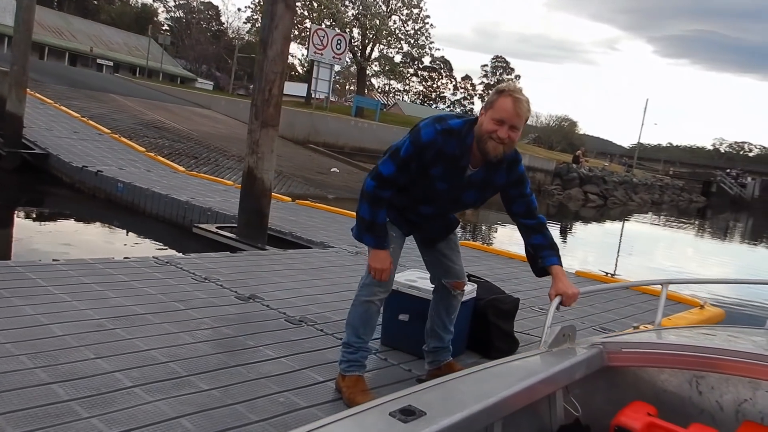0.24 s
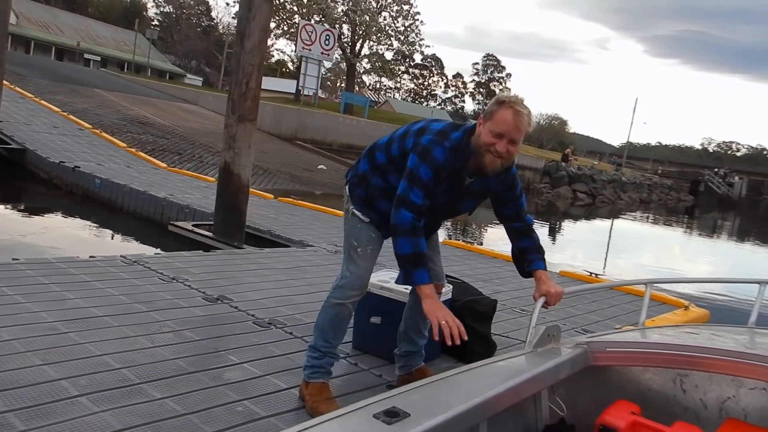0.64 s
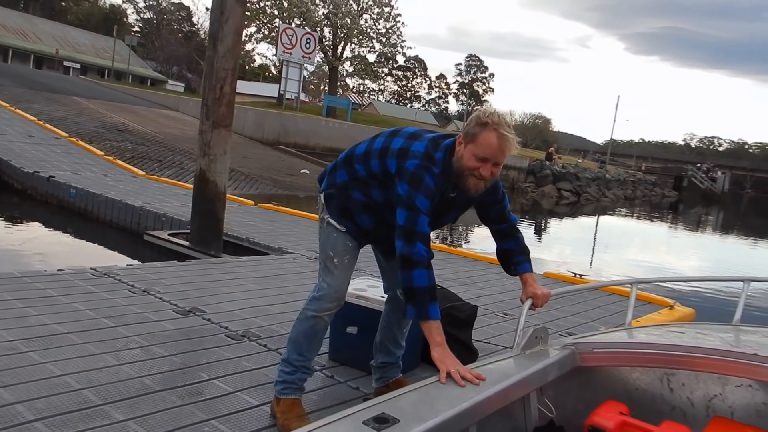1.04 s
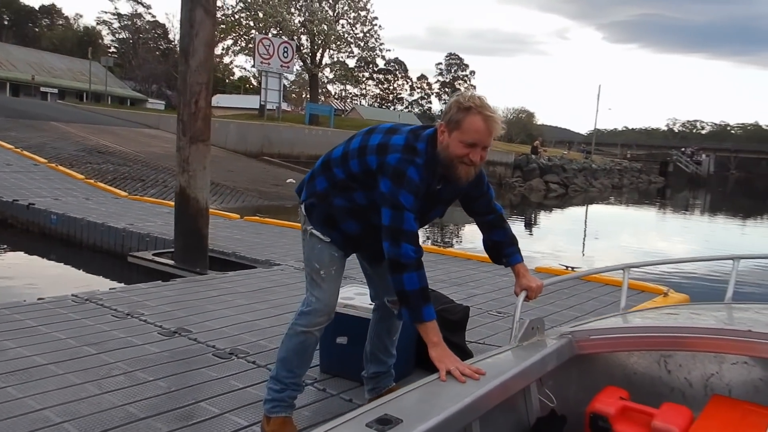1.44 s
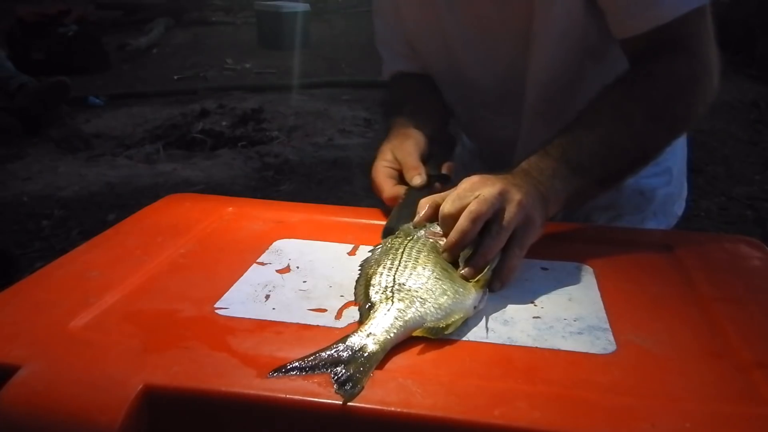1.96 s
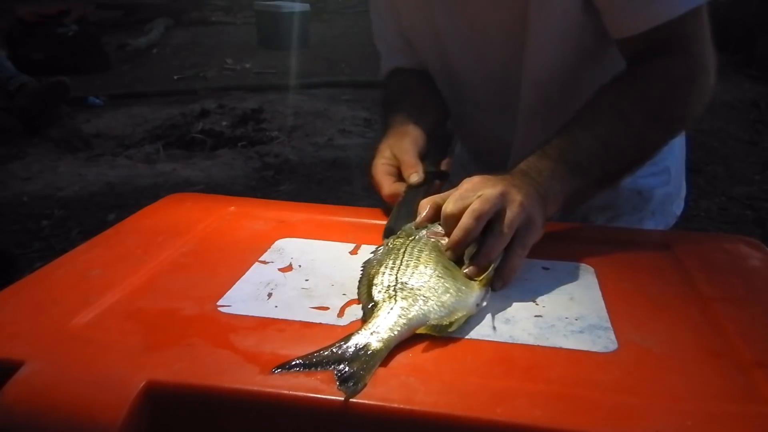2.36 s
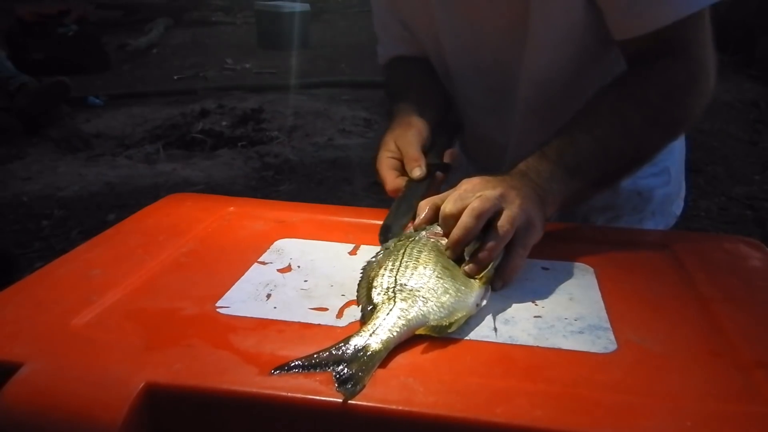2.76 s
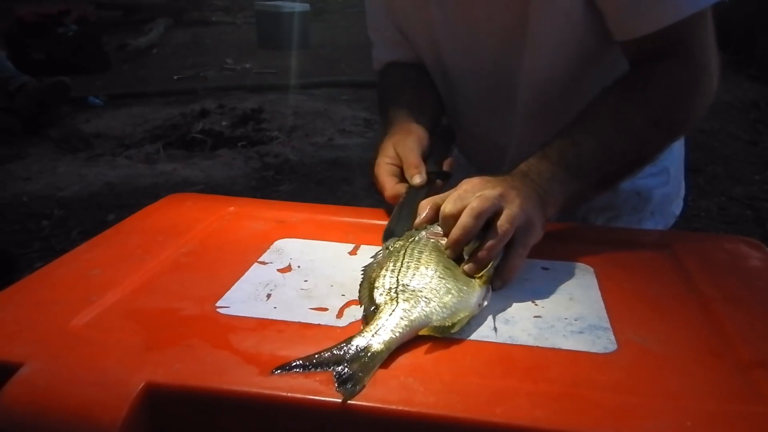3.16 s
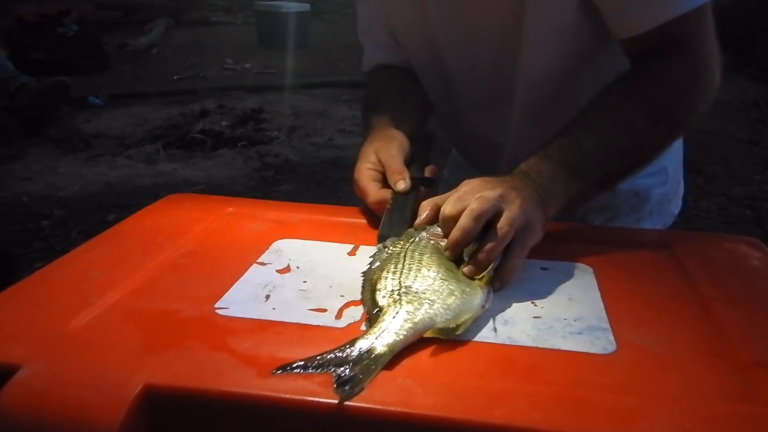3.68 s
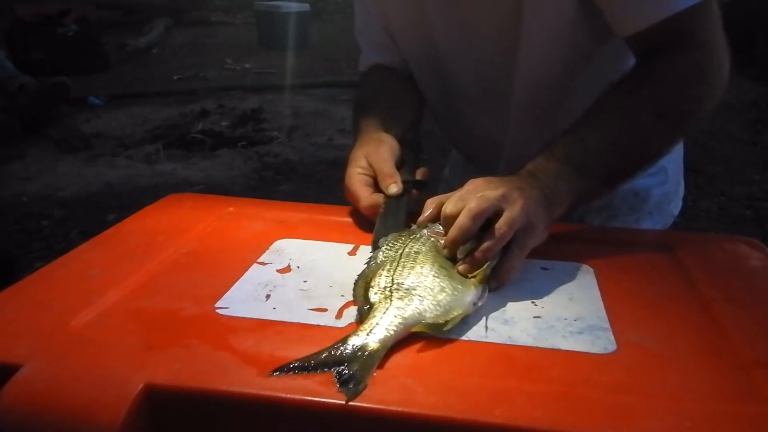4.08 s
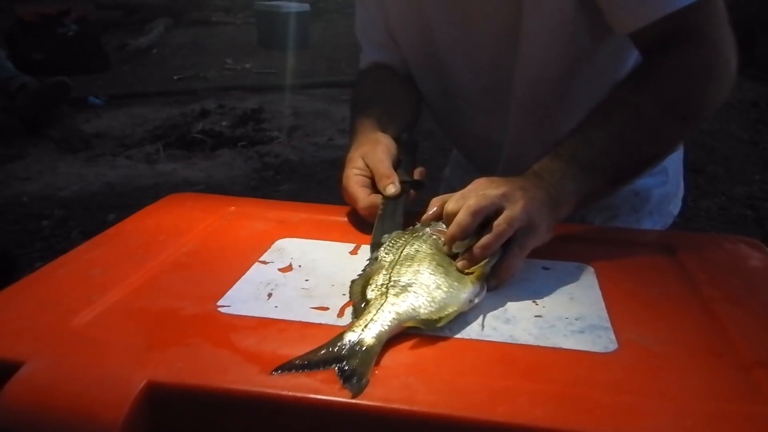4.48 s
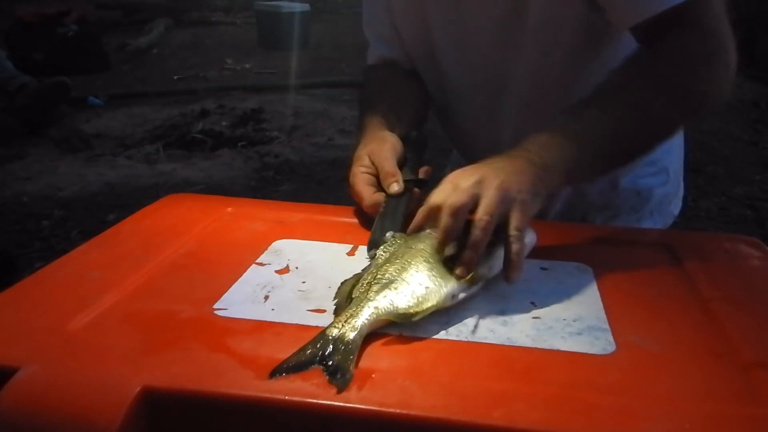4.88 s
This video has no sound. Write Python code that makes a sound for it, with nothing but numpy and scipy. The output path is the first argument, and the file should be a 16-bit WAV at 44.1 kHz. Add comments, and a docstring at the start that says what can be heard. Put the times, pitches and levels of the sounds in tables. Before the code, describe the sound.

Rumbling outboard and droning metal hull stop at a sudden cut, leaving soft, close knife scrapes, scale ticks and small bone snaps.

```python
"""Outboard at idle, then fish scaling in a yard

An outboard runs in an aluminium boat: firing pulses modulate exhaust noise, the block clatters, hull panels drone.
The scene changes abruptly to a quiet yard, where a knife rasps through a fish in short strokes: random tiny catches
ring blade and board, bones snap as damped resonances, and a hollow cool box below the plastic board knocks low.
The right channel hears pressure, the left the difference between two ports, with a hiss of its own."""
import sys
import numpy as np
from scipy import signal
from scipy.fft import rfft, irfft
from scipy.io import wavfile
from scipy.ndimage import uniform_filter1d, map_coordinates

SR = 44100
rng = np.random.default_rng(int(sys.argv[2]) if len(sys.argv) > 2 else 0)


def log_audio(samples):
    """Write samples as a 16-bit WAV file to the path given in sys.argv[1]."""
    # one column per channel
    frames = np.atleast_2d(samples).T
    # limit to full scale, then quantise
    limited = np.clip(frames, -1, 1)
    pcm = np.round(limited * 32767).astype(np.int16)
    wavfile.write(sys.argv[1], SR, pcm)


N = 225499
T = np.arange(N) / SR
FREQ = np.arange(N // 2 + 1) * SR / N
TOP_HZ = 12400  # upper band edge of the output, and the highest pitch of a scale
RESONANCE_DRIFT = 0.07  # share by which the resonances of blade and board shift
# All source levels are relative: scene() applies a further gain to both channels.


def undb(db):
    """Level to amplitude: 20 dB for each factor of ten."""
    return 10 ** (np.asarray(db) / 20)


def unit(x):
    """Normalise the power: scale to rms 1."""
    return x / np.sqrt(np.mean(x ** 2))


def curves(rows):
    """Linear interpolation: each column of a table, joined by straight lines in time."""
    s, *columns = np.transpose(rows)
    return [np.interp(T, s, c) for c in columns]


def ramp(x):
    """Raised-cosine step: a smooth rise from 0 to 1 as x goes from 0 to 1."""
    return np.sin(np.pi / 2 * np.clip(x, 0, 1)) ** 2


def colour(x, points, size=8192):
    """Minimum-phase filtering: a causal body with the given (frequency [Hz], level [dB]) response; rms 1."""
    hz, db = np.transpose(points)
    grid = np.maximum(np.arange(size // 2 + 1) * SR / size, 1)
    log_gain = np.log(undb(np.interp(np.log(grid), np.log(hz), db)))
    # folding the cepstrum onto positive times makes the response causal
    cepstrum = irfft(log_gain)
    cepstrum[1:size // 2] *= 2
    cepstrum[size // 2 + 1:] = 0
    impulse_response = irfft(np.exp(rfft(cepstrum)))
    return unit(signal.fftconvolve(x, impulse_response)[:N])


def noise():
    """White noise: independent Gaussian samples with equal power at all frequencies."""
    return rng.standard_normal(N)


def walk(rate):
    """Slow random modulation: chance values, `rate` a second, joined by lines; spread near 1."""
    return np.interp(T * rate, np.arange(N), noise()) * np.sqrt(1.5)


def drifting(x, share, rate):
    """Variable-speed reading: all resonances of x slide up and down together."""
    return map_coordinates(x, [np.cumsum(1 + share * walk(rate))], mode="mirror")


def grains(rate, spread_db):
    """Shot noise: random impacts, `rate` a second, of unequal size; the rate does not change the power."""
    size = undb(spread_db * np.clip(noise(), -2.5, 2.5))
    happens = rng.random(N) < rate / SR
    return unit(happens * size * np.sign(noise()) / np.sqrt(rate))


def pings(lo_hz, hi_hz, cycles, spread_db, glide, count, size):
    """Damped free vibration: `count` short rings at random times and pitches, gliding upwards if glide > 0."""
    when, pitch = rng.random((count, 2)).T
    gain = undb(spread_db * np.clip(rng.standard_normal((count, 1)), -2, 2))
    turns = (lo_hz * (hi_hz / lo_hz) ** pitch)[:, None] * T[:size]
    age = turns / cycles
    rings = gain * np.exp(-age) * np.sin(2 * np.pi * turns * (1 + glide * age))
    places = (when * N).astype(int)[:, None] + np.arange(size)
    return unit(np.bincount(places.ravel(), rings.ravel(), N + size)[:N])


def snap(hz, ring_s, splinter_db=-14, splinter_s=0.014, size=2048):
    """Excited resonance: a hard contact and its after-rattle pass twice through one damped mode."""
    t = T[:size]
    decay = np.exp(-t / ring_s) + undb(splinter_db) * np.exp(-t / splinter_s)
    contact = rng.standard_normal(size) * decay
    resonance = signal.iirpeak(hz, 1.9, fs=SR)
    return unit(signal.lfilter(*resonance, signal.lfilter(*resonance, contact)))


def crack(decay_s=0.0007, dull=0.69, size=2048):
    """Brittle fracture: a decaying broadband burst, low-passed by one pole at `dull`."""
    burst = rng.standard_normal(size) * np.exp(-T[:size] / decay_s)
    return unit(signal.lfilter([1], [1, -dull], burst))


def add(out, s, sound, db):
    """Superposition: put a short sound into out at time s with the given peak level."""
    i = int(s * SR)
    out[i:i + len(sound)] += (undb(db) * sound / np.abs(sound).max())[:N - i]


def yard():
    """Filtered noise and frequency modulation: a faint, steady far-off rush with a thin, wavering whine."""
    # far-off rush: (frequency [Hz], level [dB])
    rush_colour = [(140, 3), (250, -2), (430, -5.5), (640, -1.5), (790, -6.5), (1000, 1), (1300, -16),
                   (1680, -8), (1770, -2.5), (1880, -11), (3400, -24), (4600, -26), (6500, -37.5),
                   (14000, -63)]
    rush_db, whine_hz, whine_db = -61, 1750, -79
    phase = np.cumsum(whine_hz * (1 + .007 * walk(25))) / SR
    whine = undb(whine_db + 2 * walk(10)) * np.sqrt(2) * np.sin(2 * np.pi * phase)
    return undb(rush_db) * colour(noise(), rush_colour) + whine


def cool_box(hz=150, decay_s=0.011, size=4096):
    """Cavity resonance: the hollow plastic box answers with a short, damped low knock."""
    # the blade comes down on the board and the box below answers: (time [s], peak level [dB])
    box_knocks = [(2.015, -52), (3.463, -45), (3.882, -51.5), (4.409, -51)]
    out, t = np.zeros(N), T[:size]
    onset = 1 - np.exp(-t / 0.0017)
    knock = -np.sin(2 * np.pi * hz * t) * np.exp(-t / decay_s) * onset
    for s, db in box_knocks:
        add(out, s, knock, db)
    return out


def panels(fade_s=0.055):
    """Plate vibration: hull panels swell into slowly gliding, nearly pure drones; loose parts knock."""
    # hull panels that drone: (start [s], end [s], start pitch [Hz], end pitch [Hz], level [dB])
    drones = [(-.1, 0.378, 398, 395.3, -29.5), (-.1, 0.37, 602, 603, -44.5),
              (0.272, .44, 138, 143.4, -26.5), (0.591, 0.788, 393, 393, -32.5),
              (.62, .86, 151.7, 166.4, -26.5), (1.068, 1.342, 266, 279.7, -30),
              (1.182, 1.34, 292.9, 313, -30), (1.115, 1.483, 550.3, 550, -40),
              (1.172, 1.433, 965, 934, -36.5)]
    # loose fittings tick and the hull bumps: (time [s], peak level [dB], pitch [Hz], rattle [s])
    knocks = [(.318, -20.5, 955, 0.007), (0.417, -41, 5700, 0.013), (0.587, -36, 4780, 0.0035),
              (0.847, -36, 4960, 0.0038), (1.054, -39.5, 6060, 0.0039), (1.347, -26.5, 1300, 0.002),
              (1.568, -18, 735, 0.006), (1.577, -31, 680, 0.0019)]
    bright_knock_hz = 2000  # fittings that ring above this also clack; the hull only bumps
    out = np.zeros(N)
    for start, end, start_hz, end_hz, db in drones:
        hz = np.interp(T, [start, end], [start_hz, end_hz])
        phase = np.cumsum(hz * (1 + .005 * walk(20))) / SR
        held = np.clip(np.minimum(T - start, end - T) / fade_s, 0, 1)
        flutter_db = 1.6 * walk(20)
        out += undb(db + flutter_db) * held * np.sqrt(2) * np.sin(2 * np.pi * phase)
    for s, db, hz, rattle_s in knocks:
        ring = snap(hz, ring_s=rattle_s)
        clack = undb(-3.5) * crack(decay_s=rattle_s, dull=0.9) * (hz > bright_knock_hz)
        add(out, s, ring + clack, db)
    return out


def boom():
    """Tonal radiation: the deep note of the exhaust as one sine of varying pitch and level."""
    # wavers and throbs under throttle, then sinks to a steady idle: (time [s], pitch [Hz], level [dB])
    deep_note = [(0.01, 77.8, -17.5), (.05, 74.6, -38), (.09, 83, -19), (.13, 83, -41), (.16, 78.7, -16),
                 (.2, 75.9, -32.5), (.32, 86.5, -22), (.368, 75.3, -17), (.405, 69.8, -34),
                 (.47, 84.7, -30), (.565, 75.2, -24), (.62, 77, -33.5), (.695, 71, -19.5), (.75, 82.8, -48),
                 (.786, 84.2, -21), (.91, 81.6, -25.5), (.97, 65.95, -49), (1.3, 62.18, -34),
                 (1.67, 61.53, -32)]
    hz, db = curves(deep_note)
    cycle = np.cumsum(hz) / SR + rng.random()
    return undb(db) * np.sqrt(2) * np.sin(2 * np.pi * cycle)


def outboard():
    """Pulse-modulated noise: uneven firings drive exhaust gas through water, shake hull and block."""
    # held slightly open, then let back towards idle: (time [s], throttle opening [0-1])
    throttle_track = [(0, 0.83), (.36, 0.99), (.9, 0.73), (.96, 0.57), (1.15, .33), (1.42, 0.39),
                      (1.56, 0.34)]
    # steady notes: (multiple of the firing rate [1], level at idle [dB re burble], throttle open [dB re burble])
    exhaust_notes = [(1, -41, -19), (4, -28, -11)]
    # responses of exhaust, hull and block: (frequency [Hz], level [dB])
    exhaust_colour = [(20, -29.5), (33, -23), (45, -27), (62, -2.5), (82, -7.5), (110, -4.5), (150, -3.5),
                      (235, -8.5), (275, -5.5), (350, -15), (480, -19.5), (900, -70.5)]
    hull_colour = [(170, -11), (235, -9.5), (290, 5), (350, -9.5), (450, -8), (554, 3), (693, -6),
                   (769, 3.5), (840, -2.5), (950, 1), (1030, 1.5), (1100, -6), (1400, -16), (2500, -82)]
    block_colour = [(700, -2.5), (1300, 4.5), (1500, 0.5), (2140, -3), (2400, -7.5), (3200, -15),
                    (5000, -26), (6200, -21), (7500, -24.5), (9200, -35.5), (11200, -36), (13000, -52)]
    idle_hz, throttle_rise_hz = 30.9, 2.5  # firings per second at opening 0, and their rise at opening 1
    # each part: level at opening 0, and its change at opening 1
    exhaust_db, exhaust_rise_db = -32.5, 11
    hull_db, hull_rise_db = -30.5, -3.5
    clatter_db, clatter_rise_db = -42.5, 7

    throttle, = curves(throttle_track)
    firing_hz = idle_hz + throttle_rise_hz * throttle
    cycle = np.cumsum(firing_hz * (1 + 0.012 * walk(13))) / SR
    strength = undb(1.8 * noise()[cycle.astype(int)])  # one chance value per firing
    puff = strength * np.exp(-(cycle % 1) / 0.1)

    exhaust = colour(noise() * (2.0 + puff), exhaust_colour)
    for multiple, idle_db, open_db in exhaust_notes:
        note_db = idle_db + (open_db - idle_db) * throttle + 0.34 * walk(2.6)
        turns = multiple * cycle + rng.random()
        exhaust += undb(note_db) * np.sqrt(2) * np.sin(2 * np.pi * turns)

    bubbles = pings(lo_hz=867.5, hi_hz=1084, cycles=34.0, spread_db=6.5, glide=0.0012, count=150, size=2400)
    hull = colour(noise() * (3.2 + puff), hull_colour) + undb(-11.0) * bubbles

    clanks = pings(lo_hz=1290, hi_hz=2140, cycles=3.4, spread_db=-1.0, glide=0, count=700, size=2000)
    impacts = grains(9000, spread_db=2.0) * (2.0 + puff)
    clatter = colour(impacts, block_colour) + undb(-14.5) * clanks
    return (undb(exhaust_db + exhaust_rise_db * throttle) * exhaust
            + undb(hull_db + hull_rise_db * throttle) * hull
            + undb(clatter_db + clatter_rise_db * throttle + 1.06 * walk(40.4)) * clatter)


def flicks():
    """Elastic release: a scale springs free with one dry, bright tick at its own pitch."""
    # single scales that flick off the edge: (time [s], peak level [dB])
    sprung_scales = [(1.717, -46), (1.917, -38), (2.057, -40), (2.275, -49), (2.316, -45), (2.324, -40),
                     (2.407, -42), (2.963, -54), (3.494, -48), (3.529, -42), (3.544, -41.5), (4.216, -51),
                     (4.245, -39), (4.2648, -40), (4.948, -45), (5.017, -44), (5.022, -41)]
    centre_hz, spread_octaves = 5600, 0.54
    out = np.zeros(N)
    for s, db in sprung_scales:
        hz = min(centre_hz * 2 ** (spread_octaves * rng.standard_normal()), TOP_HZ)
        ring = snap(hz, ring_s=0.00017, splinter_db=-6, splinter_s=0.0033)
        add(out, s, ring + undb(4.0) * crack(decay_s=0.00016, dull=0.091), db)
    return out


def bones():
    """Brittle fracture: a crack and a very short ring; each snap has a softer burst just before its peak."""
    # bones that snap under the edge: (time [s], peak level [dB], pitch [Hz], length of the break [s])
    breaks = [(1.804, -55, 3275, 0.0019), (1.8995, -48, 3130, 0.002), (2.01, -33, 4480, 0.00039),
              (2.019, -41.5, 4340, 0.0021), (2.0599, -38, 2850, 0.0045), (2.8197, -48.5, 4200, 0.002),
              (3.201, -48.5, 4500, 0.0025), (3.2215, -45.5, 2450, 0.0028), (3.259, -42, 3920, 0.0022),
              (3.414, -42.5, 3550, 0.0065), (3.456, -41, 3950, 0.00062), (3.4637, -32.5, 3600, 0.00067),
              (4.403, -47.5, 3300, 0.0018), (4.476, -43.5, 4430, .002), (4.926, -44, 1960, .008),
              (4.986, -41, 4050, 0.0077)]
    lead_s, lead_db = 0.0053, -13  # the soft onset comes this long before the peak, this much lower
    crack_db = -4  # broadband crack against the ring
    out = np.zeros(N)
    for s, db, hz, break_s in breaks:
        for at, peak_db in (s - lead_s, db + lead_db), (s, db):
            ring = snap(hz, ring_s=break_s, splinter_db=-15.5, splinter_s=0.0064)
            add(out, at, ring + undb(crack_db) * crack(), peak_db)
    return out


def teeth():
    """Stick-slip: the edge jumps from one row of scales to the next in uneven, short bursts; rms 1."""
    rows_per_s = 260  # median; the rate wanders about it
    row = np.cumsum(rows_per_s * undb(4 * walk(150))) / SR
    strength = undb(2.2 * noise()[row.astype(int)])
    return unit(strength * (.45 + np.sin(np.pi * row) ** 4))


def knife():
    """Friction as shot noise: catches on scales, sparse when light, dense when firm, ring blade and board."""
    # knife strokes: (start [s], length [s], level of the edge [dB], board level [dB re edge])
    strokes = [(1.655, 0.2, -68, -6), (1.729, 0.054, -58.5, 2), (1.898, 0.12, -58, -2.5),
               (1.997, 0.11, -61, -25), (2.131, 0.098, -71, -14), (2.24, 0.11, -59.5, -0.5),
               (2.383, 0.069, -62, 4.5), (2.63, 0.11, -73, -16), (2.778, 0.089, -59.5, -1.5),
               (3.225, 0.085, -60.5, -0.5), (3.27, 0.2, -67, -3), (3.393, 0.05, -57, -18),
               (3.509, 0.1, -61, 0.5), (3.612, 0.13, -54, -0.5), (3.825, 0.12, -57, -13),
               (3.969, 0.12, -47.5, -1.5), (4.085, 0.11, -51.5, -2.5), (4.21, 0.11, -58.5, 1.5),
               (4.321, 0.13, -62.5, -14), (4.456, 0.1, -50.5, -3), (4.558, 0.092, -56, 0),
               (4.674, 0.12, -50.5, -0.5), (4.74, 0.12, -64.5, 7), (4.824, 0.089, -64.5, 6.5),
               (4.892, 0.16, -63.5, 2)]
    # responses of the board and the edge: (frequency [Hz], level [dB])
    board_colour = [(80, -19), (160, 5), (250, -16), (350, 3.5), (450, -4.5), (1000, -2), (1190, 4.5),
                    (1550, -8.5), (1950, -1), (2400, -12), (4000, -21)]
    edge_colour = [(800, -29), (2000, -2), (2900, 7), (3700, -2), (4500, 7), (5700, -5), (8000, -10.5),
                   (11000, -6.5), (12200, -19), (13500, -38)]
    attack_s, release_s = 0.045, 0.047  # the edge bites in, holds, and lifts off
    firm_db, firm_catches_per_s = -49.5, 4500  # a lighter stroke catches in proportion less often
    brush_db, tear_db = -15, -13
    blade_hz, blade_db = 4400, -8.5  # the blade's own ring

    edge, board = np.zeros(N), np.zeros(N)
    for start, length, db, board_db in strokes:
        push = undb(db) * ramp((T - start) / attack_s) * ramp((start + length - T) / release_s)
        edge += push
        board += push * undb(board_db)
    # the edge brushes the skin around each stroke
    contact = uniform_filter1d(uniform_filter1d(edge, size=2600), size=2600)
    edge = np.hypot(edge, undb(brush_db) * contact)
    firmness = np.clip(edge / undb(firm_db), .12, 1.5)
    catches = grains(firm_catches_per_s * firmness, spread_db=3) * teeth()

    # the blade's angle rocks, and the rasp turns brighter and duller with it
    hiss = drifting(colour(catches, edge_colour), RESONANCE_DRIFT, rate=20)
    dull = signal.sosfiltfilt(signal.butter(2, 5500, fs=SR, output="sos"), hiss)
    bright = undb(4.7 * walk(60) + 1.0) * (hiss - dull)
    rasp = undb(-4.0) * edge * (dull + bright)

    # the factor firmness makes the blade ring chiefly in firm strokes
    blade = unit(signal.lfilter(*signal.iirpeak(blade_hz, 10, fs=SR), catches))
    rasp += undb(blade_db) * edge * firmness * blade

    ring = drifting(colour(catches + 0.58 * noise(), board_colour), RESONANCE_DRIFT, rate=16)
    squelch = pings(lo_hz=950, hi_hz=2000, cycles=9, spread_db=3, glide=.01, count=900, size=1200)
    rasp += board * (ring + undb(-7.5) * squelch)

    # the board's reflection lightly combs the rasp, and the comb shifts as the blade moves
    lag_s = .0009 + .0003 * walk(14)
    combed = rasp + .3 * np.interp(T - lag_s, T, rasp)

    # whole scales tear loose with a crisp tick, during a stroke and just around it
    tears = np.diff(grains(110, spread_db=5), prepend=0)
    return combed + undb(tear_db) * np.hypot(edge, .5 * contact) * colour(tears, edge_colour)


def nearby(x, size=4096):
    """Scattering: the box lid and the body behind it return each tick as a very short, diffuse tail."""
    level_db, decay_s = -14.5, 0.016
    tail = rng.standard_normal(size) * np.exp(-T[:size] / decay_s)
    return x + undb(level_db) * signal.fftconvolve(x, tail / np.linalg.norm(tail))[:N]


def air():
    """Superposition of sources: the boat, then all at once the yard."""
    cut_s, cut_fade_s = 1.686, 0.02  # the short crossfade ends at the cut
    boat = np.clip((cut_s - T) / cut_fade_s, 0, 1)
    fade_in = np.minimum(T / .004, 1)
    afloat = outboard() + boom() + panels()
    ashore = nearby(knife() + flicks() + bones()) + cool_box() + yard()
    return fade_in * boat * afloat + (1 - boat) * ashore


def scene():
    """Pressure on the right; on the left its gradient, thin in the bass and a quarter cycle ahead."""
    # hiss of the left channel: (frequency [Hz], level [dB])
    hiss_colour = [(25, 20), (130, 10.5), (1500, 1.5), (4000, -8), (7000, -22.5), (13000, -36)]
    hiss_db = -67
    null_hz, port_top_hz = 12650, 10400  # where the two ports cancel; where their response falls off
    diffuse_hz = 7500  # where scattered sound takes over
    # two independent random draws of the same events
    direct, scattered = rfft(air()), rfft(air())
    port_rolloff = np.hypot(1, (FREQ / port_top_hz) ** 6)
    gradient = undb(-1.5) * np.sin(np.pi * FREQ / null_hz) / port_rolloff
    # towards the treble more of the sound reaches the ports by way of nearby surfaces
    share = np.clip(0.0075 + FREQ ** 2 / (FREQ ** 2 + diffuse_hz ** 2), 0, 1)
    left = 1j * gradient * (np.sqrt(1 - share) * direct + np.sqrt(share) * scattered)
    # the divisor keeps the summed power of both channels even over frequency
    pair = irfft(np.array([left, direct]) * 2 / np.sqrt(1 + gradient ** 2), N)
    pair[0] += undb(hiss_db) * colour(noise(), hiss_colour)
    return pair


def record(dry):
    """Band limiting: a steep elliptic low-pass removes the extreme treble."""
    return signal.sosfilt(signal.ellip(8, .2, 70, TOP_HZ, fs=SR, output="sos"), dry)


dry = scene()
out = record(dry)
log_audio(out)
```